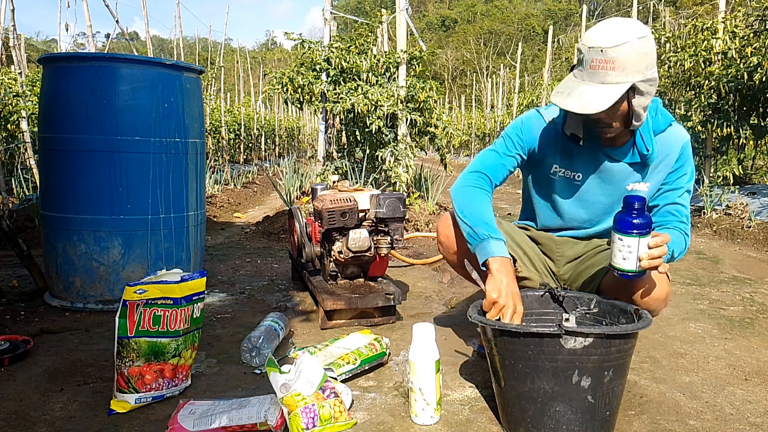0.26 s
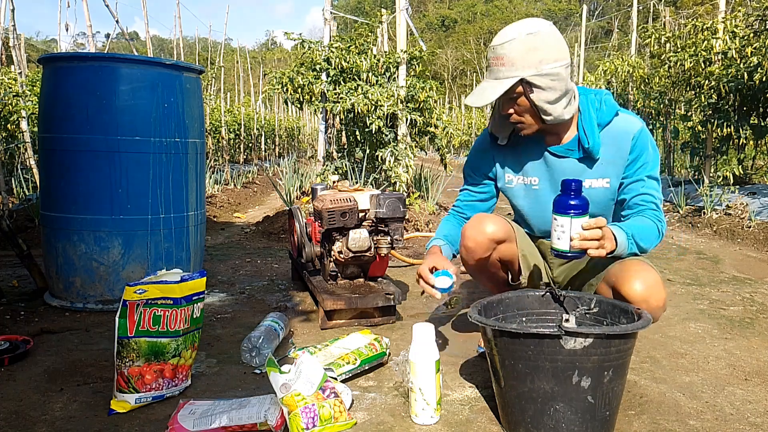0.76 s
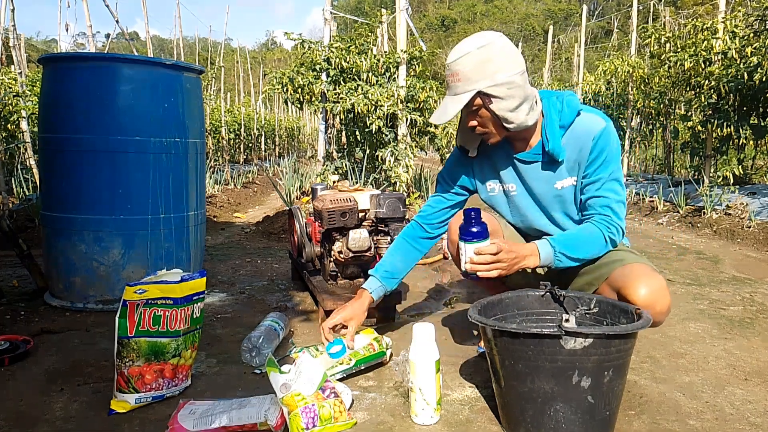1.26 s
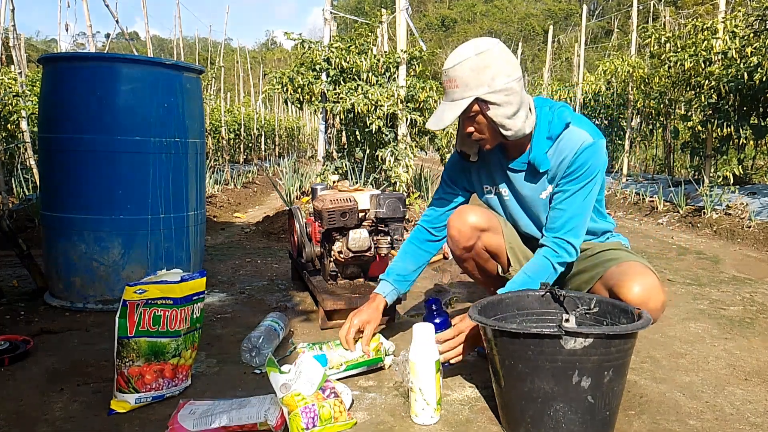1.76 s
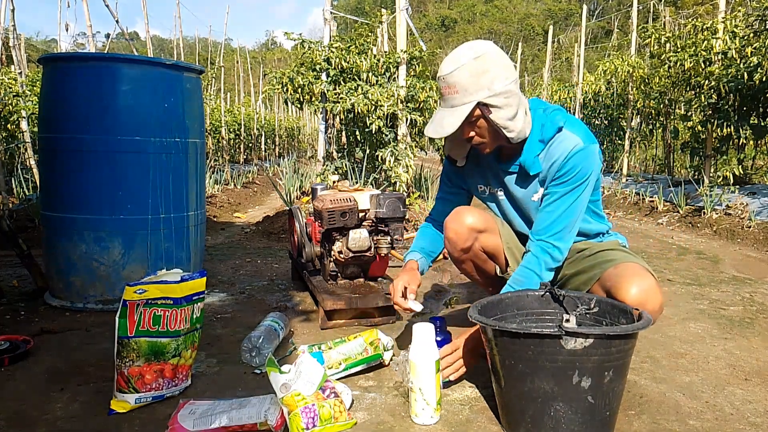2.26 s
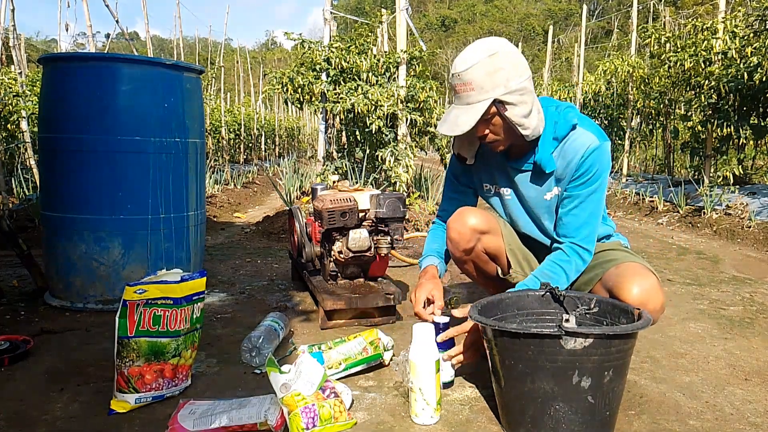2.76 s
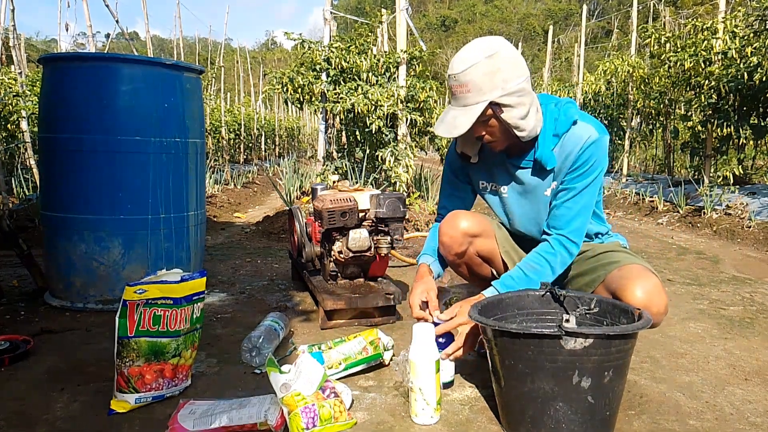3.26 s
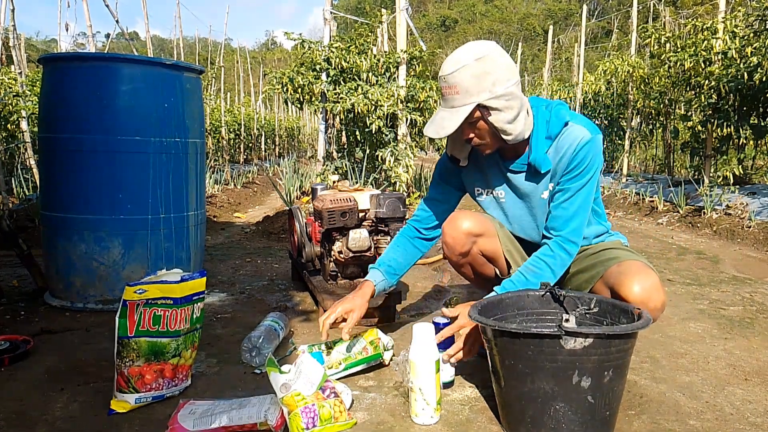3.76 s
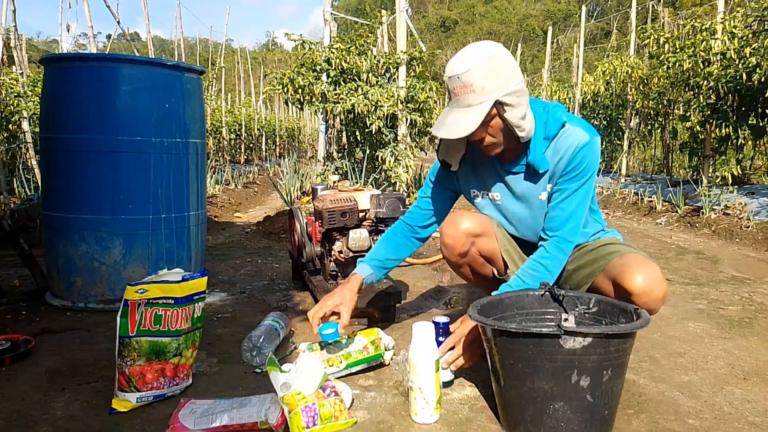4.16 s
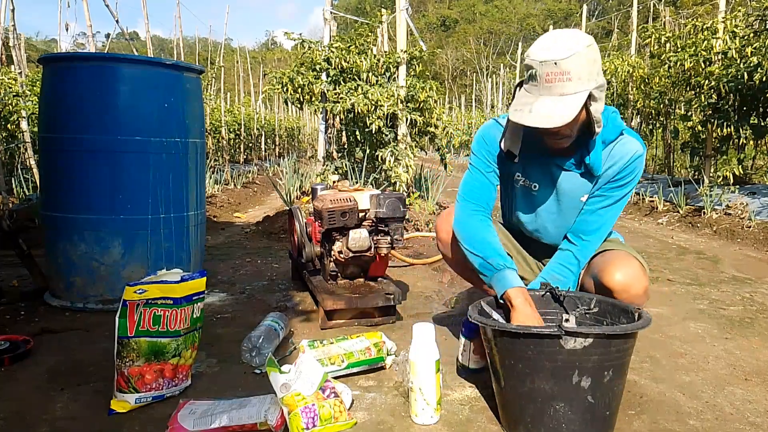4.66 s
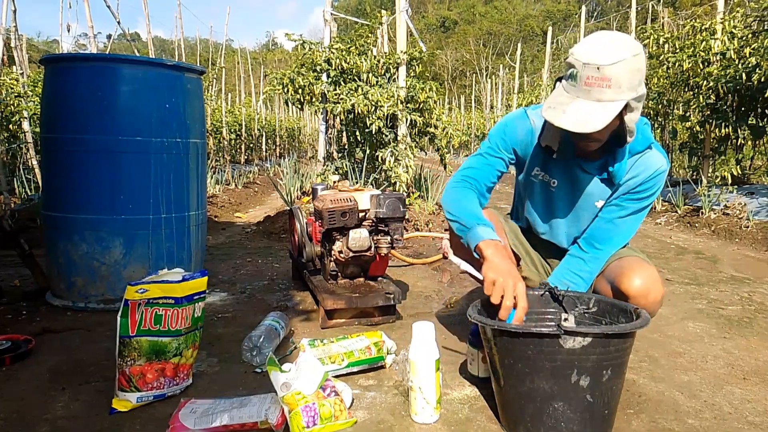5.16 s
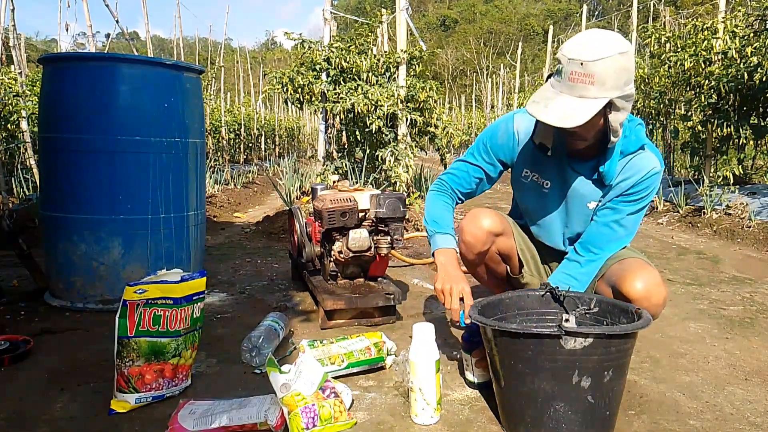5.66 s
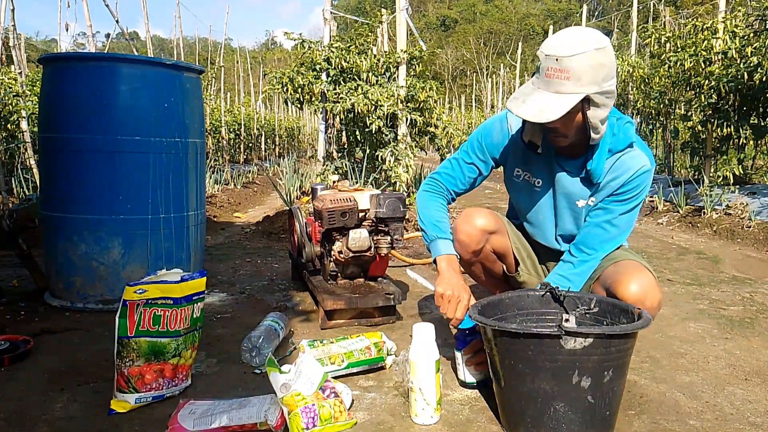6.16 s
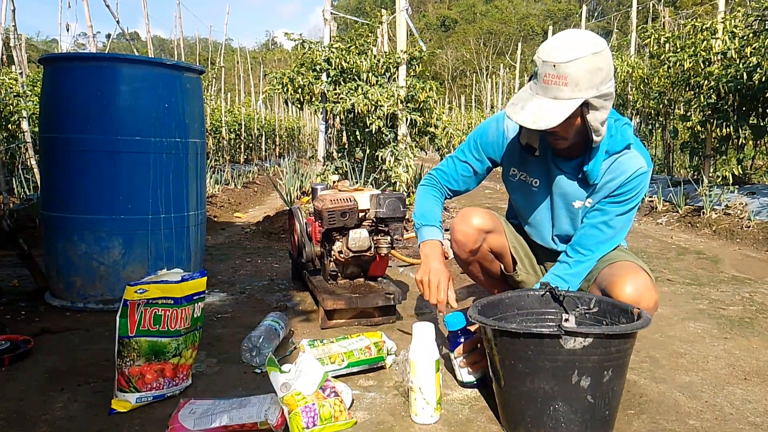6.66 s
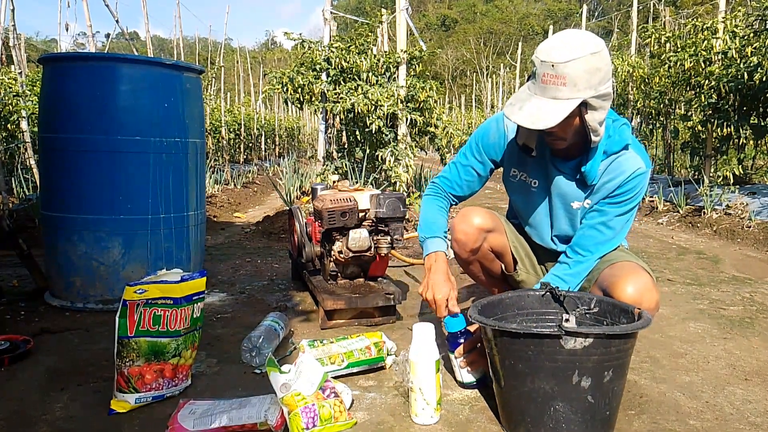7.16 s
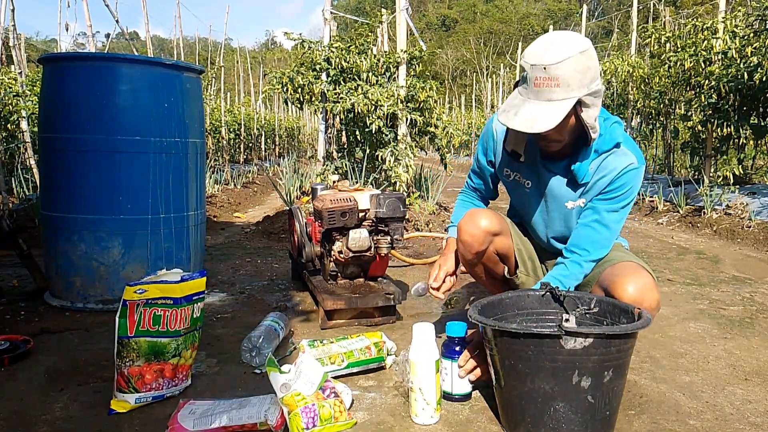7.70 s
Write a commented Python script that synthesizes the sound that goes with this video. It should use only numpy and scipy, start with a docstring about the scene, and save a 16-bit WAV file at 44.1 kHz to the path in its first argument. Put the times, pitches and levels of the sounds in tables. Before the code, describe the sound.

A quiet open garden, heard dry and fairly close. At 0.3 seconds a measuring cap knocks the rim of a plastic bucket in a tight double hit, then again at 0.5, hardest, with quick weak rebounds; the wall gives a short hollow clack. A soft sleeve swish follows. From 1.3 to 2.2 foil packaging crackles in small uneven snaps, strongest near 1.95. Light bottle clicks and a tiny squeak come at 2.4-2.6, and a crisp stopper snap at 3.3. Cloth rubs at 4.0 and 4.6. At 4.8 a short liquid plop with rising bubble tones sounds in the bucket. Around 5.6-5.9 come faint bucket knocks and hoarse plastic squeaks, then sparse cap ticks until 7.2. Throughout, a high insect around 8-9 kilohertz pulses four times a second over a distant insect chorus, murmuring air and a very faint low hum.

```python
"""Insects shrill in pulses over quiet open air, where a gardener measures liquid into a plastic bucket.
He raps a measuring cap on the rim, lays it on a foil packet, snaps a bottle's stopper home, rinses the
cap in the bucket and screws it on; his sleeves swish. Struck things are damped modes plus decaying noise,
short tones and bubbles are rising sines, squeaks and cloth are shaped noise, the near insect is a click train
in a resonance, and the far insects and the air are filtered noise, with a low hum in the air."""
import sys
import numpy as np
from scipy import signal
from scipy.fft import rfft, irfft, next_fast_len
from scipy.io import wavfile

SR = 44100
rng = np.random.default_rng(int(sys.argv[2]) if len(sys.argv) > 2 else 0)


def unload_wav(signal):
    """Save mono or channel-first audio to the path in sys.argv[1] as 16-bit WAV at rate SR, clipped to [-1, 1]."""
    wavfile.write(
        sys.argv[1],
        SR,
        np.round(np.clip(np.atleast_2d(signal).T, -1, 1) * 32767).astype(np.int16),
    )


N = 349713
BLOW_T = np.arange(SR // 4) / SR  # time axis of one short sound [s]


def from_db(db):
    """Decibels to amplitude gain: 20 dB is a factor of ten."""
    return 10 ** (np.asarray(db) / 20)


def rms_one(x):
    """Normalize the mean power: scale to rms 1."""
    return x / np.sqrt(np.mean(np.abs(x) ** 2) + 1e-20)


def in_time(rows):
    """Linear interpolation: each column of a curve at every sample."""
    s, *columns = np.transpose(rows)
    return [np.interp(np.arange(N) / SR, s, c) for c in columns]


def add(out, s, sound):
    """Superposition: mix a sound in from time s."""
    at = min(max(round(s * SR), 0), N)
    out[at:at + len(sound)] += sound[:N - at]


def noise(spectrum, size, tilt=0):
    """Spectral shaping: white noise filtered to a spectrum, tilted in dB per octave, at rms 1."""
    octave = np.log2(np.maximum(np.arange(size // 2 + 1) * SR / size, 1))
    hz, db = np.transpose(spectrum)
    spectrum_db = np.interp(octave, np.log2(hz), db)
    tilt_db = tilt * np.clip(octave, 8, 13)  # the tilt acts from 256 to 8192 Hz
    return rms_one(irfft(rfft(rng.standard_normal(size)) * from_db(spectrum_db + tilt_db), size))


def drift(rate_hz, size=N):
    """Low-pass noise: random wavering up to about a given rate, at rms 1."""
    padded = next_fast_len(size)
    hz = np.arange(padded // 2 + 1) * SR / padded
    slow = rfft(rng.standard_normal(padded)) / (1 + (hz / rate_hz) ** 4)
    return rms_one(irfft(slow, padded)[:size])


def ring(hz, db, t60, rise_cycles):
    """Modal synthesis: damped sines, each taking some cycles to build up as the blow spreads."""
    hz, db, t60 = (np.asarray(v)[:, None] for v in (hz, db, t60))
    cycles = hz * BLOW_T
    signs = (-1) ** np.arange(len(hz))[:, None]
    decay = from_db(db - 60 * BLOW_T / t60)
    build_up = 1 - np.exp(-cycles / rise_cycles)
    return np.sum(signs * decay * build_up * np.sin(2 * np.pi * cycles), axis=0)


def wash(spectrum, tilt, t60, treble_loss):
    """Dense modes as noise with frequency-dependent damping: treble dies first, t60 [s] holds at 1 kHz."""
    rest, out = noise(spectrum, size=len(BLOW_T), tilt=tilt), 0
    for hz in 250 * 2 ** np.arange(7):  # octave centres
        top_hz = min(hz * np.sqrt(2), .45 * SR)
        low_pass = signal.butter(2, top_hz, fs=SR, output="sos")
        band = signal.sosfiltfilt(low_pass, rest, padtype="even")
        rest = rest - band
        band_t60 = t60 * (hz / 1000) ** -treble_loss
        out = out + band * from_db(-60 * BLOW_T / band_t60)
    return out


def rasp(centre_hz, width_hz):
    """Quadrature modulation: slow noise carried up to a narrow band whose centre may move."""
    turn, size = 2 * np.pi * np.cumsum(centre_hz) / SR, len(centre_hz)
    return rms_one(drift(width_hz, size=size) * np.cos(turn) + drift(width_hz, size=size) * np.sin(turn))


def raps():
    """Bouncing contact: each rebound comes sooner and weaker; yields (s, dB, place, brightness)."""
    # cap and hand on the bucket: (time [s], strength [dB], place on the rim [0-1],
    # brightness [dB per octave], rebounds [count])
    knocks = [(0.3003, -2.5, 0, -0.5, 1), (0.3106, -6.5, 0.1, -1.5, 0), (0.383, -31.5, 1, 2, 0),
              (.4878, 0, 0.93, 1, 2), (4.838, -30.5, 0.54, 1.5, 0), (5.677, -24, 1, -2, 0),
              (5.738, -27.5, 0.55, -0.5, 0)]
    first_gap_s, gap_shrink = .047, .86  # each later gap is shorter by this factor
    first_db, loss_db = -17, 9  # first rebound against the rap; loss on each later one
    for s, db, place, bright, rebounds in knocks:
        yield s, db, place, bright
        for k in range(round(rebounds)):
            s = s + first_gap_s * gap_shrink ** k
            yield s, db + first_db - loss_db * k, .6, -3  # a fixed, duller place on the rim


def bucket(crack_db=-26, tail_db=-43, linger_db=-25, linger=2.9):
    """Modal excitation: where a rap lands weights the wall's modes; the rim cracks, wall and hollow hum on."""
    # wall modes: (frequency [Hz], level struck at place 0 [dB], level struck at place 1 [dB], t60 [s])
    bucket_modes = [(228, -20.5, -28.5, 0.075), (286, -26.5, -38, 0.064), (407.3, -23, -17, 0.068),
                    (488, -26, -14, 0.039), (615, -15, -41, 0.047), (700, -29, -26, 0.054),
                    (786, -28, -25.5, 0.045), (920, -31, -38, 0.082), (1073, -51, -31.5, 0.077),
                    (1285, -20, -27.5, 0.038), (1400, -25, -48, 0.054), (1606, -29.5, -39, 0.063),
                    (1690, -28.5, -59, 0.051), (1812, -27, -43, .055), (1930, -48, -40, 0.064),
                    (2065, -31, -45, 0.063), (2240, -39, -47, .05), (2453, -52, -42, 0.073),
                    (2750, -53, -42, 0.061), (4260, -44, -27.5, 0.021), (5440, -29, -41, 0.023),
                    (6062, -35, -71, 0.051)]
    # dense weak modes: (frequency [Hz], density [dB per Hz])
    bucket_wash = [(110, -23), (200, 0), (500, -1.5), (800, -1.5), (1030, -9), (1280, -2.5), (2100, -16),
                   (2450, -21.5), (3500, -15), (4300, -13.5), (6300, -15.5), (8500, -20.5), (11000, -44),
                   (16000, -48)]
    out = np.zeros(N)
    hz, near_db, far_db, t60 = np.transpose(bucket_modes)
    for s, db, place, bright in raps():
        mode_db = near_db + place * (far_db - near_db) + bright * np.log2(hz / hz[2])
        wall = ring(hz, mode_db, t60, rise_cycles=1.5)
        lingering = ring(hz, mode_db + linger_db, t60 * linger, rise_cycles=5.8)
        crack = from_db(crack_db) * wash(bucket_wash, bright, t60=0.089, treble_loss=.25)
        hollow = from_db(tail_db) * wash(bucket_wash, bright - 1.5, t60=0.34, treble_loss=0.16)
        add(out, s, from_db(db) * (wall + lingering + crack + hollow))
    return out


def snaps():
    """Repeated buckling: a press on foil is an uneven run of snaps; yields (s, dB, brightness)."""
    # presses on the packet: (time [s], peak level [dB], brightness [dB per octave],
    # build-up [s], time to fade by 20 dB [s])
    presses = [(1.275, -32.7, 1, 0, .065), (1.332, -32.5, -8, 0, .015), (1.382, -33, 1.5, 0, .012),
               (1.479, -47, -7, 0, .07), (1.519, -33, -5, 0, .014), (1.621, -35.5, -1.5, 0, .06),
               (1.78, -42, 2, 0, .06), (1.948, -22.3, -3, .04, .058), (2.1, -45, -9, 0, .08),
               (2.158, -51, 9, 0, .006), (2.203, -45.5, -2, 0, .014)]
    gap_s, gap_spread = .0105, .15  # median gap; log-normal spread
    scatter_db, first_snap_db = .8, -9.5  # snap-to-snap spread; start of a build-up against its peak
    for s, db, bright, build, fade in presses:
        chance = rng.standard_normal((16, 2))
        gaps = gap_s * np.exp(gap_spread * chance[:, 0])
        times = np.cumsum(gaps) - gaps[0]
        for t, scatter in zip(times, chance[:, 1]):
            shape_db = first_snap_db * (1 - t / build) if t < build else -20 * (t - build) / fade
            if shape_db > -30:  # weaker snaps are left out
                yield s + t, db + shape_db + scatter_db * scatter, bright


def packet(skin_db=-9, modes_db=-6):
    """Impulsive excitation: each snap of the foil skin drums on the filled packet's modes."""
    # foil skin: (frequency [Hz], density [dB per Hz])
    foil_skin = [(100, -21), (220, -10.5), (450, -2), (650, -0.5), (950, -5), (1100, -6.5), (1330, -4.5),
                 (1500, -7.5), (2100, -10.5), (3000, -19.5), (5000, -25.5), (8000, -40), (12000, -54)]
    # filled packet, before random spread: (frequency [Hz], level [dB], t60 [s])
    packet_modes = [(447, -9.5, 0.11), (529.4, -11.5, 0.11), (638, -6, .07), (765, -6, .07),
                    (941, -11, 0.077), (997, -11, 0.039), (1272, -15.5, 0.052), (1783, -30, 0.067)]
    out = np.zeros(N)
    hz, mode_db, t60 = np.transpose(packet_modes)
    skin_t60 = np.log(1000) * .013  # from the decay time to 1/e [s]
    for s, db, bright in snaps():
        skin = wash(foil_skin, bright, t60=skin_t60, treble_loss=0.081)
        snap_hz = hz * (1 + 0.013 * rng.standard_normal(len(hz)))
        snap_db = mode_db + rng.normal(0, 5.2, len(hz))
        drum = ring(snap_hz, snap_db, t60, rise_cycles=0.86)
        add(out, s, from_db(db) * (from_db(skin_db) * skin + from_db(modes_db) * drum))
    return out


def ticks():
    """Random point process: fingers tick faintly at uneven gaps; yields (s, dB, thump dB, brightness)."""
    # fingers on cap and bottle: (start [s], end [s], level [dB])
    fiddling = [(4.882, 4.915, -55.5), (5.02, 5.11, -58), (6.475, 6.56, -56), (6.82, 6.86, -54),
                (7.08, 7.17, -59)]
    gap_s, scatter_db = .028, 1.5  # median gap; level spread
    for start, end, db in fiddling:
        chance = rng.standard_normal((12, 2))
        times = start + gap_s * (np.cumsum(np.exp(.3 * chance[:, 0])) - .5)
        for s, scatter in zip(times[times < end], chance[:, 1]):
            yield s, db + scatter_db * scatter, -9, 1.5


def bottle(modes_db=-2, body_db=1, tail_db=-21):
    """Modal synthesis: a plastic snap rings the neck and thumps the bottle's body."""
    # stopper and cap: (time [s], level [dB], body thump [dB], brightness [dB per octave])
    clicks = [(0.028, -52, -14, 3), (2.433, -47, -24, -3), (2.634, -44, 7, 0.5), (3.3356, -42.5, 2, -9),
              (3.3409, -30, 3.5, 3.3), (5.674, -45.5, -1, -4), (5.716, -45, -17, -1.5),
              (5.844, -52, -10, -0.5), (6.259, -53, 4.5, -0.5), (6.471, -47.5, -4, -1), (6.772, -47, 0, 0),
              (6.82, -48.5, -3, 4.5), (7.067, -44.5, 6, 2.5), (7.212, -50.5, -10, -4)]
    # neck, then body: (frequency [Hz], level [dB], t60 [s])
    neck_modes = [(1630, -10.5, 0.094), (2490, -12.5, 0.036), (2850, -14.5, 0.067), (3350, -12, .045),
                  (4420, -20, .04), (5385, -13, .035), (6140, -15, .06), (6450, -11, 0.046)]
    body_modes = [(122, -11, 0.075), (183, -8, 0.061), (244, -0.5, 0.055), (355, -5, 0.04),
                  (488, -11.5, 0.034)]
    # dense weak modes: (frequency [Hz], density [dB per Hz])
    bottle_wash = [(80, -35), (200, 11), (600, 8), (1050, 2.5), (1650, 2.5), (2200, -1.5), (3100, -1.5),
                   (4200, -7.5), (5800, -1.5), (8000, -11), (11000, -29), (16000, -19)]
    out = np.zeros(N)
    hz, mode_db, t60 = np.transpose(neck_modes)
    for s, db, thump_db, bright in [*clicks, *ticks()]:
        neck_db = modes_db + mode_db + bright * np.log2(hz / hz[0]) + rng.normal(0, 0.67, len(hz))
        neck = ring(hz, neck_db, t60, rise_cycles=1.0)
        body = from_db(body_db + thump_db) * ring(*np.transpose(body_modes), rise_cycles=0.67)
        snap = wash(bottle_wash, bright, t60=.07, treble_loss=0.21)
        tail = from_db(tail_db) * wash(bottle_wash, bright, t60=0.33, treble_loss=0.067)
        add(out, s, from_db(db) * (neck + body + snap + tail))
    return out


def tones_and_bubbles(climb_per_s=0.72, rise_s=0.00086):
    """Damped oscillation: short tones ring and climb in pitch, the later ones as a plop's air pockets."""
    # short ringing tones as bottle and packet are handled, then from 4.7 s the plop's air pockets:
    # (time [s], starting pitch [Hz], height [dB], t60 [s])
    short_tones = [(2.157, 560, -46, .13), (2.418, 610, -41.5, 0.05), (2.44, 526, -50, .15),
                   (2.484, 505, -48.5, 0.13), (4.772, 405, -50, 0.12), (4.803, 830, -42.5, 0.074),
                   (4.822, 401, -40, 0.13), (4.823, 640, -40, 0.045), (4.8325, 744, -24.5, 0.024),
                   (4.835, 250, -40, 0.046), (4.8385, 825, -27, 0.028), (4.841, 1770, -49, 0.034)]
    out = np.zeros(N)
    for s, hz, db, t60 in short_tones:
        swell = (1 - np.exp(-BLOW_T / rise_s)) * from_db(db - 60 * BLOW_T / t60)
        cycles = hz * BLOW_T * (1 + climb_per_s * BLOW_T / 2)  # integral of the climbing pitch
        add(out, s, swell * np.sin(2 * np.pi * cycles))
    return out


def squeaks(scrape_db=-13):
    """Stick-slip friction: fingers on smooth plastic give short hoarse squeaks, with a wider scrape."""
    # squeaks: (time of the middle [s], pitch [Hz], level [dB], half length [s], width [Hz])
    squeak_rows = [(0.1, 2784, -53.5, 0.014, 260), (2.435, 1500, -43.5, 0.0024, 493),
                   (2.436, 2830, -53, 0.0041, 600), (2.494, 1946, -60, 0.0064, 297),
                   (5.584, 2230, -43, 0.0059, 262), (5.607, 1973, -44, 0.011, 220),
                   (5.87, 2180, -53, 0.0061, 260), (5.903, 1937, -48.5, 0.0094, 171),
                   (6.824, 3980, -50, 0.0076, 650)]
    out, t = np.zeros(N), BLOW_T - np.mean(BLOW_T)
    for s, hz, db, half, width in squeak_rows:
        centre = np.full(len(t), hz)
        slips = rasp(centre, width) + from_db(scrape_db) * rasp(centre, width_hz=1450)
        squeak = from_db(db) * slips * np.exp(1 - np.sqrt(1 + (t / half) ** 2))
        add(out, s + t[0], squeak[s + t >= 0])
    return out


def sleeves(grain_db=2.0):
    """Friction noise: cloth rubs in a grainy swell with each quick move of the arm."""
    # swishes: (time of the middle [s], level [dB], half length [s])
    swishes = [(0.045, -57.5, 0.011), (0.129, -56.5, 0.034), (0.636, -52.5, 0.028), (1.111, -55, 0.027),
               (4.013, -55.5, 0.054), (4.59, -57.5, 0.021), (4.705, -60, 0.034), (5.143, -58, 0.01),
               (5.231, -57.5, 0.041), (7.138, -64, 0.022)]
    # rubbing cloth: (frequency [Hz], density [dB per Hz])
    cloth = [(300, -5), (1000, -4.5), (1700, -2), (2600, 0), (4200, -1.5), (6500, -8.5), (9000, -23),
             (14000, -37)]
    t = np.arange(N) / SR
    swell = sum(from_db(db) * np.exp(-((t - s) / half) ** 2 / 2) for s, db, half in swishes)
    grain = from_db(grain_db * drift(106))
    return swell * rms_one(noise(cloth, size=N) * grain)


def pulses():
    """Periodic excitation: the near insect keeps a beat that slows a little midway; yields (s, dB, held dB)."""
    # level at the start of a pulse: (time [s], level [dB])
    effort = [(0, -70), (.24, -65), (1.0, -66.5), (1.25, -74), (2.0, -75), (2.26, -66), (2.75, -69.5),
              (3.0, -61.5), (3.25, -67.5), (3.75, -66), (4.0, -73), (4.27, -65), (5.55, -66), (6.1, -64.5),
              (7.1, -74), (7.39, -63), (7.93, -66)]
    # pulses with a stronger held end: (time near the pulse [s], extra level [dB])
    surges = [(3.0, 6.5), (4.27, 4.5), (5.31, 4), (5.83, 6), (6.09, 4.5), (7.39, 4), (7.65, 4)]
    beat = -.004 + .2513 * np.arange(18)  # first pulse [s], period [s]
    slower_beat = 4.527 + .2603 * np.arange(14)
    starts = np.concatenate([beat, slower_beat])
    effort_db = np.interp(starts, *np.transpose(effort))
    # the held end follows a fifth of the effort's swing and grows by .4 dB per second
    held_db = -74 + .2 * (effort_db - effort_db.mean()) + .4 * starts
    for s, extra_db in surges:
        held_db[np.argmin(np.abs(starts - s))] += extra_db
    return zip(starts, effort_db, held_db)


def insect(clicks_hz=240, song_width_hz=1000, hiss_db=-4, jitter=.002, sag_per_s=.7):
    """Source and filter: a sagging train of clicks rings a high resonance that lifts and falls in each pulse."""
    # one pulse: (time from its start [s], centre [Hz], relative level [dB])
    pulse_shape = [(-.07, 8700, -16), (-.015, 9150, -3), (.03, 9240, 2), (.075, 8900, 1.5),
                   (.125, 8370, 7.5), (.18, 8250, 5.5), (.215, 8100, 5.5), (.26, 8000, -30)]
    out = np.zeros(N)
    knots, knot_hz, knot_db = np.transpose(pulse_shape)
    t = np.arange(knots[0], knots[-1], 1 / SR)
    hz, shape_db = np.interp(t, knots, knot_hz), np.interp(t, knots, knot_db)
    held = np.interp(t, knots[[2, 4]], [0, 1])  # passage from starting level to held level
    for s, db, held_db in pulses():
        rate = clicks_hz * (1 + .06 * rng.standard_normal()) * (1 - sag_per_s * t)
        turn = 2 * np.pi * np.cumsum(rate * (1 + jitter * drift(60, size=len(t)))) / SR
        # only the click train's harmonics near the resonance sound
        orders = round(np.mean(hz / rate)) + np.arange(-6, 7)[:, None]
        resonance = np.exp(-((orders * rate - hz) / song_width_hz) ** 2)
        strengths = resonance * rng.uniform(.5, 1, orders.shape)
        phases = rng.uniform(0, 2 * np.pi, orders.shape)
        lines = np.sum(strengths * np.sin(orders * turn + phases), axis=0)
        hiss = from_db(hiss_db) * rasp(hz, width_hz=910)
        level_db = shape_db + db + (held_db - db) * held
        song = rms_one(rms_one(lines) + hiss) * from_db(level_db)
        add(out, s + t[0], song[s + t >= 0])
    return out


def chorus():
    """Incoherent sum: many insects farther off blend into one high band of noise."""
    # far insects: (frequency [Hz], density [dB per Hz])
    chorus_spectrum = [(6500, -29.5), (7200, -10), (7800, -1.5), (8400, 0), (9000, -1.5), (9600, -14.5),
                       (10500, -30), (12000, -44)]
    # their level: (time [s], level [dB])
    chorus_level = [(0, -71), (2, -74), (3, -68), (3.7, -68.5), (4.5, -62.5), (5.3, -67.5), (6.1, -66.5),
                    (6.7, -68.5), (7.5, -61.5), (7.93, -70)]
    db, = in_time(chorus_level)
    high_pass = signal.butter(2, 5000, "high", fs=SR, output="sos")
    far = signal.sosfilt(high_pass, noise(chorus_spectrum, size=N))
    return from_db(db) * rms_one(far)


def air(level_db=1, waver_db=1.0):
    """Broadband ambience: a wavering murmur of open air over a very low drift, and a faint far hum."""
    # open air, over an inaudible very low drift that is no part of the field's sound:
    # (frequency [Hz], density [dB per Hz])
    air_and_drift = [(20, 9.5), (36, -37.5), (52, -5.5), (78, -18), (115, -8.5), (165, -5), (220, 2.5),
                     (300, -4), (600, -11), (1200, -16), (2500, -17), (5200, -19.5), (5800, -17),
                     (6700, -24), (8500, -13.5), (11300, -34), (15500, -27.5)]
    # level of both before offset and wavering, then of the hum: (time [s], level [dB])
    murmur_level = [(0, -60), (.2, -63), (1.4, -60.5), (2.7, -62.5), (4.6, -58.5), (5.1, -62), (5.8, -59.7),
                    (7.2, -60.8), (7.93, -56.5)]
    hum_level = [(0, -83), (2.8, -84), (3.6, -77), (4.8, -79), (5.6, -68), (6.2, -76), (7.93, -76)]
    db, = in_time(murmur_level)
    hum_db, = in_time(hum_level)
    murmur = from_db(level_db + db + waver_db * drift(9.1)) * noise(air_and_drift, size=N)
    hum = from_db(hum_db) * rasp(np.full(N, 139), width_hz=12)
    return murmur + hum


def scene(small_hz=105, dull_hz=9000):
    """Superposition of all sources, alike in both channels."""
    contacts = bucket() + packet() + bottle()
    # small soft plastic things radiate little deep bass and little top treble
    edges_hz = [small_hz, min(dull_hz, .45 * SR)]
    contacts = signal.sosfilt(signal.butter(2, edges_hz, "band", fs=SR, output="sos"), contacts)
    mono = contacts + tones_and_bubbles() + squeaks() + sleeves() + insect() + chorus() + air()
    return np.stack([mono, mono])


def record(dry):
    """Band limiting: a steep elliptic low-pass cuts the top at 15.8 kHz."""
    return signal.sosfilt(signal.ellip(10, .2, 70, 15800, fs=SR, output="sos"), dry)


dry = scene()
out = record(dry)
unload_wav(out)
```